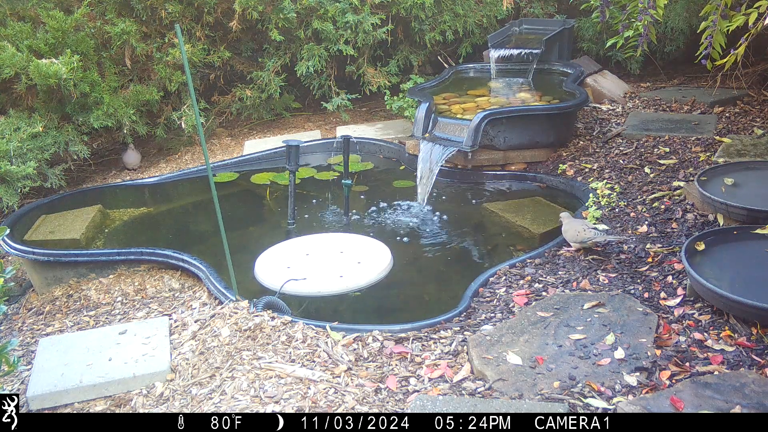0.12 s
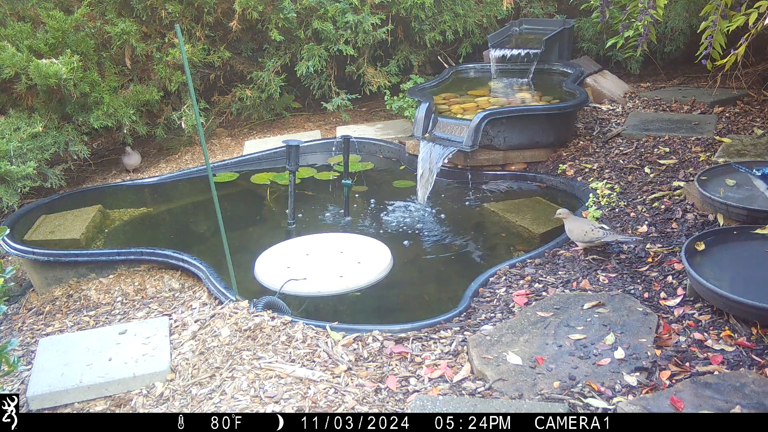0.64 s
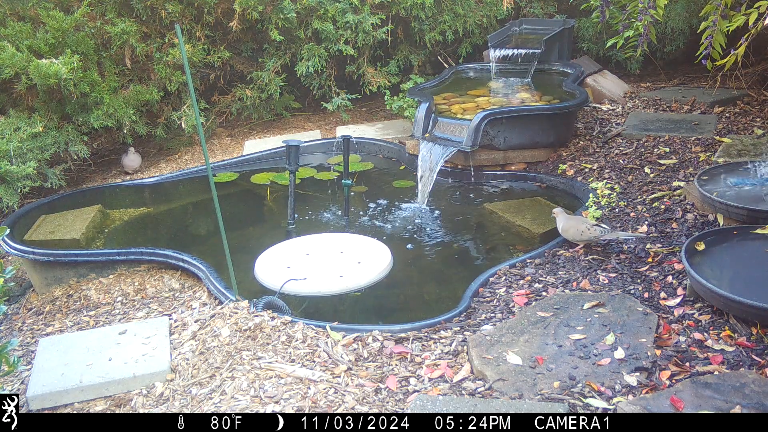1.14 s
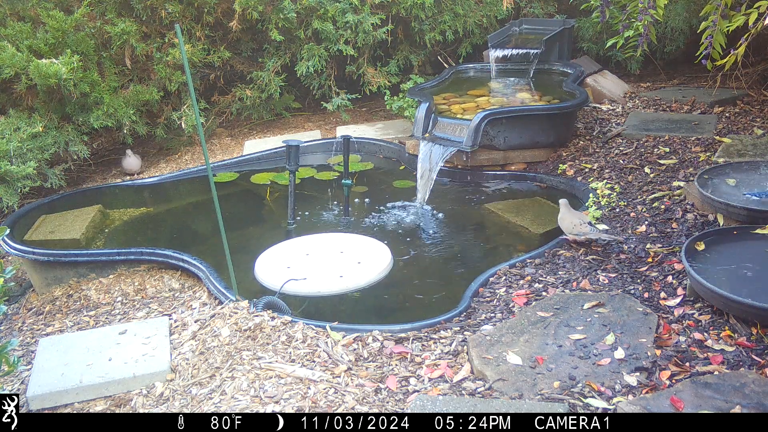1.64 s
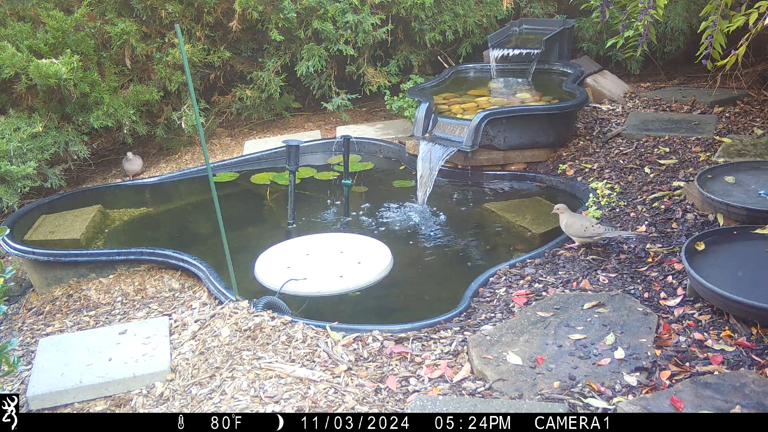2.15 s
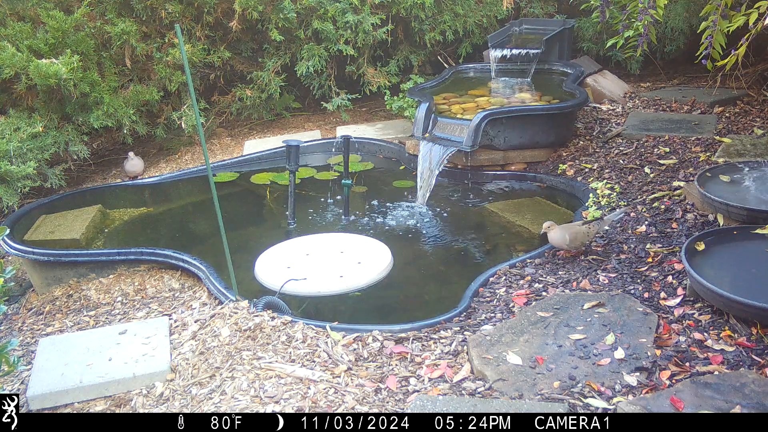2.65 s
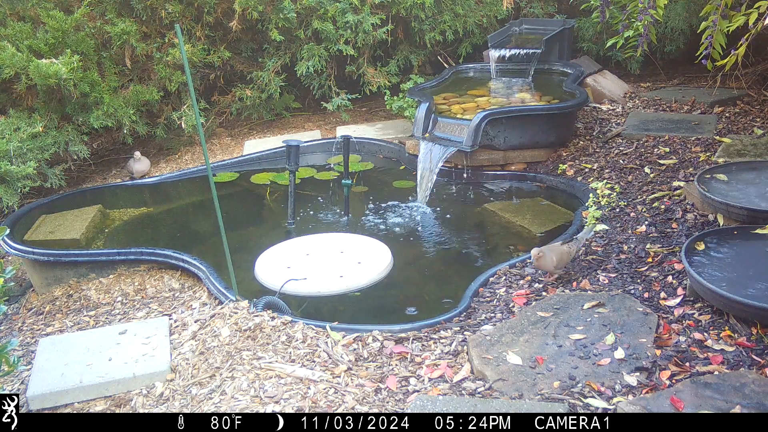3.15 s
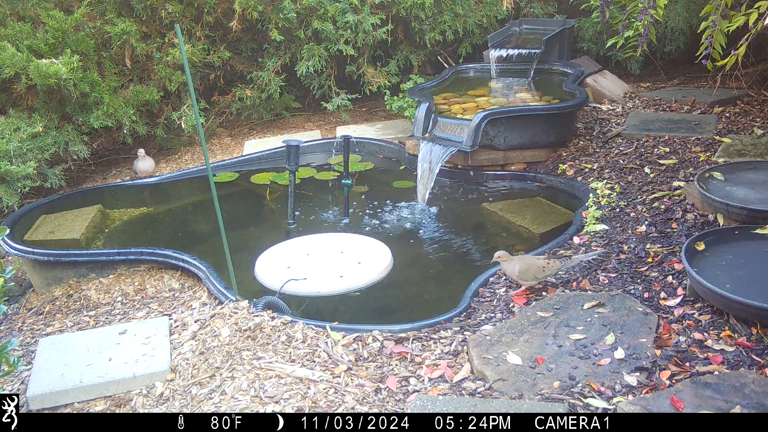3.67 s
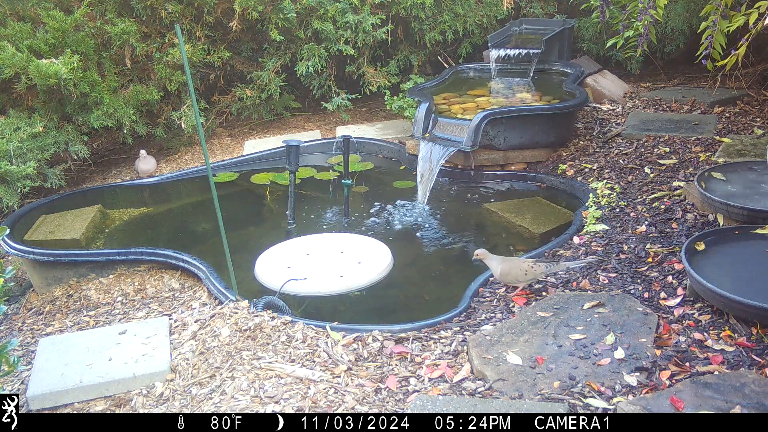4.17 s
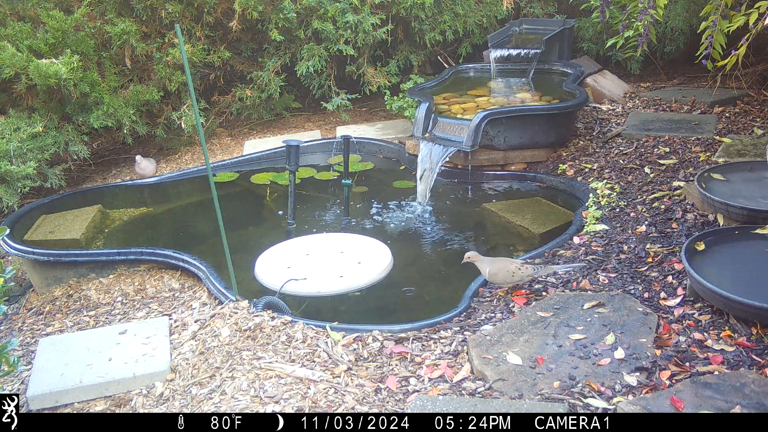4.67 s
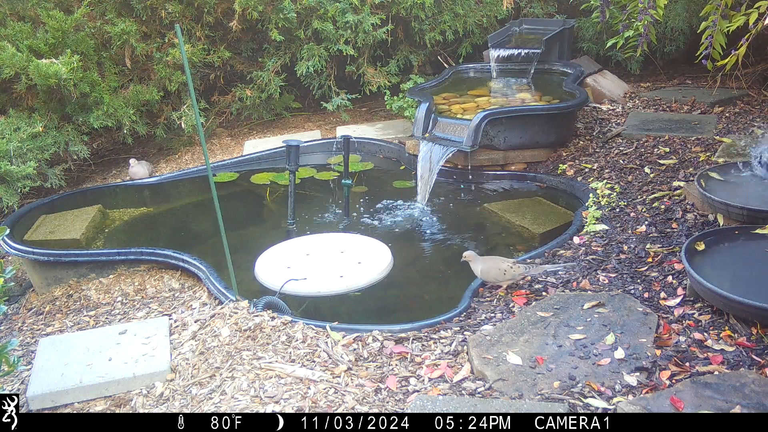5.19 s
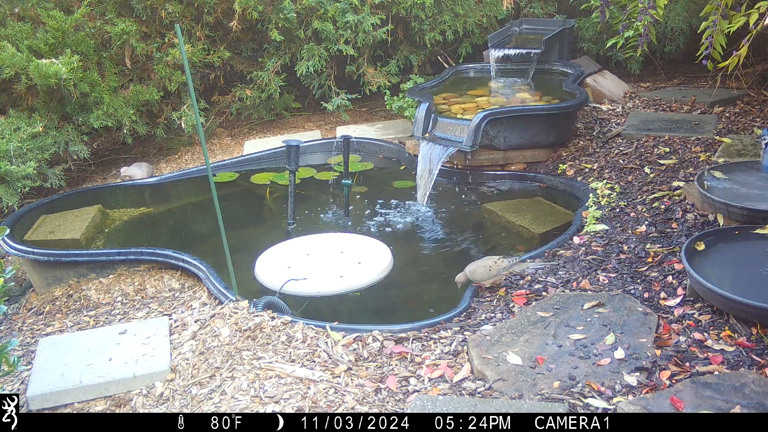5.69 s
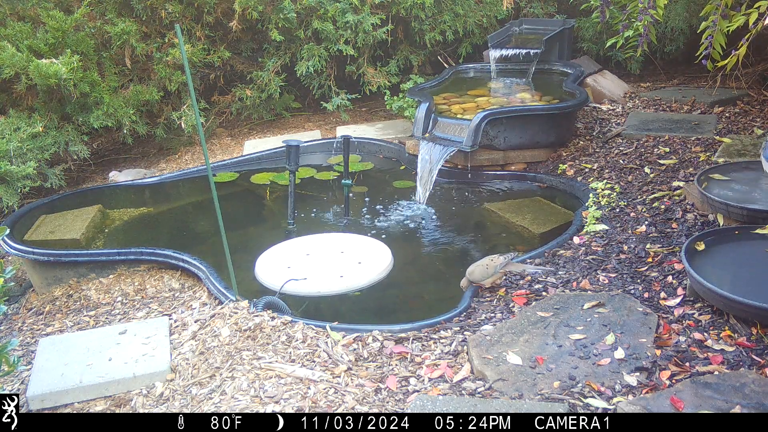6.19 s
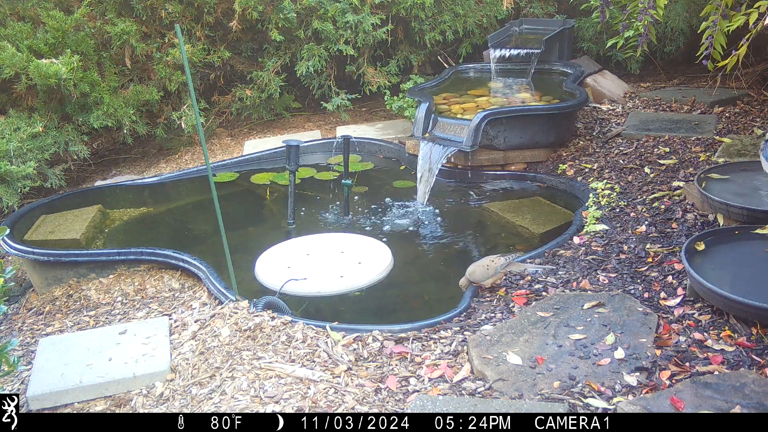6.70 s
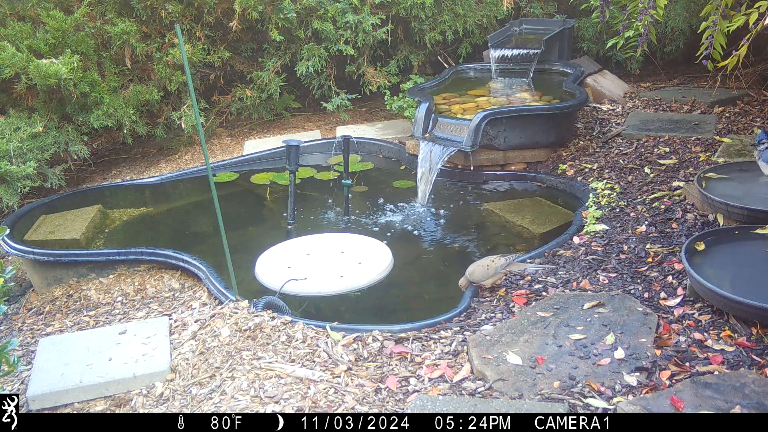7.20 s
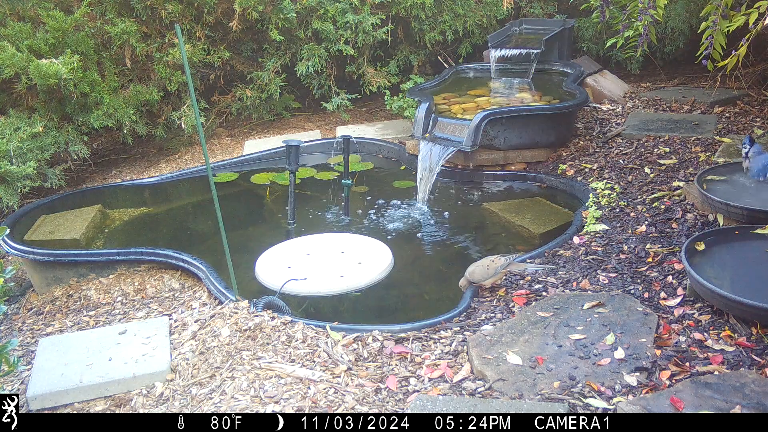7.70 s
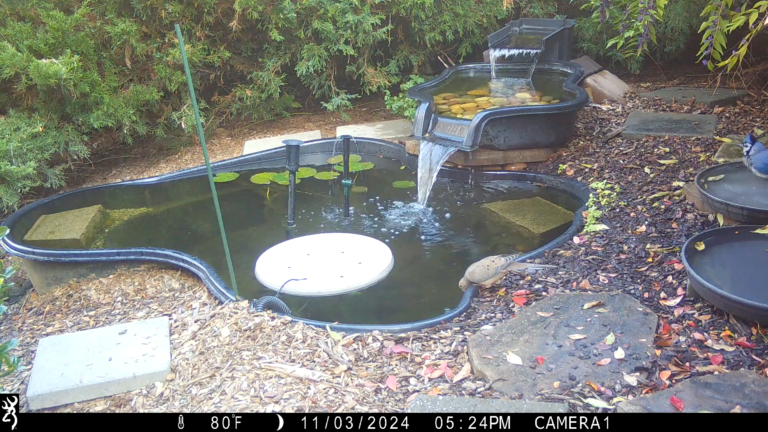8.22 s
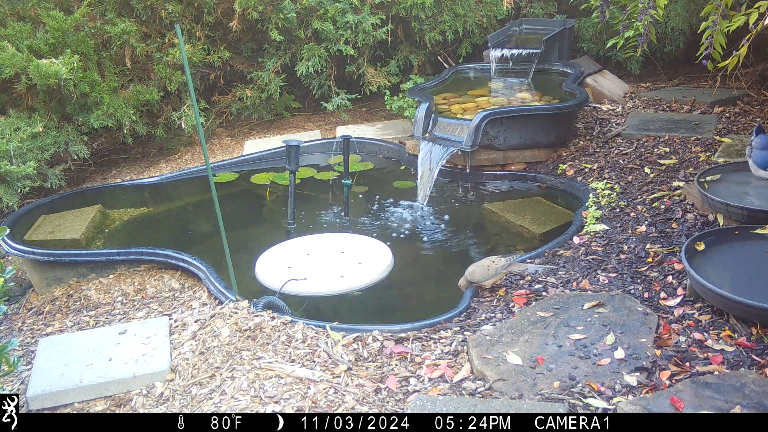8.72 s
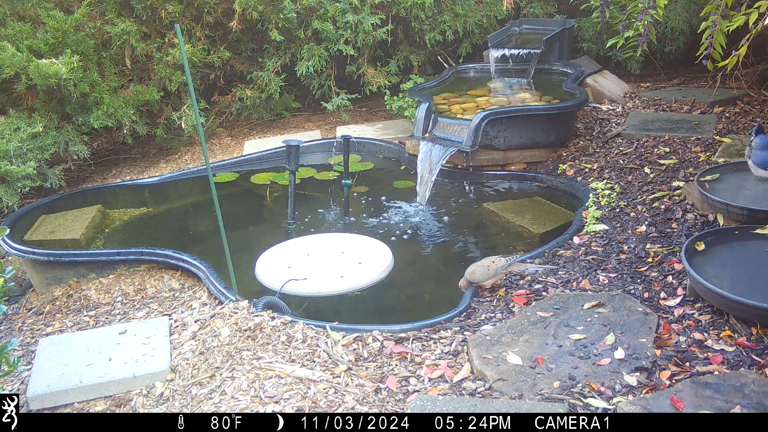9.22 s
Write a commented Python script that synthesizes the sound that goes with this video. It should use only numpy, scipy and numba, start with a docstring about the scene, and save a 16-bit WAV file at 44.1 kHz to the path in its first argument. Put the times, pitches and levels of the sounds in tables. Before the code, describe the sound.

Constant splashing trickle of a small pond waterfall, fizzing bubbles and droplet ticks, briefly interrupted by a double plastic tap.

```python
"""A sheet of water falls from a spillway into a garden pond, heard outdoors by a small narrow-band microphone.
The churned water hisses as bands of noise; trapped air bubbles ring as decaying sines that glide in pitch.
Droplets tick as bare clicks, and slaps of spray are bursts of noise.
A bird's feet knock twice on a plastic basin, whose modes ring as damped resonators.
Wavering sines give a faint pump hum and electronic whine, with a faint hiss."""
import sys
import numpy as np
from scipy import signal
from scipy.io import wavfile
from numba import njit

SR = 44100
rng = np.random.default_rng(int(sys.argv[2]) if len(sys.argv) > 2 else 0)


def to_wav(sig):
    """Store sig (one row per channel, or 1-D mono) as 16-bit WAV at the path in sys.argv[1].

    Samples outside -1..1 are clipped; the rate is SR.
    """
    pcm = np.clip(np.atleast_2d(sig), -1, 1) * 32767
    pcm = np.round(pcm).astype(np.int16)
    wavfile.write(sys.argv[1], SR, pcm.T)  # frames by channels


def linear_from_db(decibels):
    """Turn decibels (scalar or array-like) into linear amplitude factors; 0 gives 1."""
    return 10 ** (np.asarray(decibels, float) / 20)


N = 412335

# Sharpest slaps of spray, strength in the treble: start_s, level_db
SHARP_SLAPS = [(0.354, -58.5), (0.607, -61), (1.373, -61), (1.4597, -54), (1.787, -57), (1.8366, -58),
               (2.378, -54), (2.654, -64.5), (3.019, -56.5), (3.6575, -70), (3.894, -55), (4.0328, -61.5),
               (4.348, -58.5), (4.6997, -69), (6.016, -57), (6.366, -58), (7.124, -59.5), (7.191, -58.5)]
# Level of the water's sound, which swells at times: time_s, level_db
FALL_LEVEL = [(0, -45), (.5, -45.5), (.9, -46), (1.2, -43.5), (1.45, -43.5), (1.7, -45), (2.2, -45.5),
              (2.75, -44.5), (3.2, -46), (4.9, -46), (5.12, -41.5), (5.25, -44), (5.45, -46.5), (7, -47),
              (7.5, -44.5), (8.1, -46), (9.35, -46)]
# Feet on the basin, levels before the filters: start_s, peak_db, crack_hz, snap_db
FOOT_KNOCKS = [(5.0983, -5.5, 3260, -33), (5.1455, -6, 2410, -51)]
# Modes of the plastic basin, levels relative to one another: pitch_hz, level_db, t60_s
BASIN_MODES = [(1220, 0, 0.022), (1660, 8, 0.008), (2100, -13, 0.024), (2440, 5, 0.0089), (2880, -6, 0.023),
               (3300, -15, 0.026), (3700, 1.5, 0.01)]
# Relative spectral density of the water: pitch_hz, level_db (per Hz)
WATER_SPECTRUM = [(18, -52), (30, -20.5), (378, -9), (706, -4.5), (1030, -4), (1400, -7.5), (1550, -6),
                  (1950, -4.5), (2170, -10.5), (2670, -1), (3720, -6), (4300, 0), (5590, -24.5),
                  (9460, -120)]
# Faint steady tones of the electronics: pitch_hz, level_db (rms)
WHINE_TONES = [(7768, -100), (7795, -104), (7827, -100), (15590, -114)]
# Hum of the pump: pitch_hz, level_db (rms)
PUMP_TONES = [(59, -85), (124, -83.5)]
# Loudest drops, each plucking the bubble it traps; levels before the filters: start_s, peak_db, pitch_hz, t60_ms
LOUD_DROPS = [(0.245, -26.5, 3360, 26), (0.353, -30.5, 1250, 100), (0.6039, -35, 1466, 115),
              (0.606, -37.5, 524, 25), (0.727, -30, 3470, 15), (0.853, -30.5, 1530, 17),
              (0.9423, -33, 1360, 58), (1.017, -35, 1510, 52), (1.1479, -26.5, 2350, 10),
              (1.319, -29.5, 3700, 20), (1.3738, -17.5, 2250, 3.7), (1.4154, -27.5, 3120, 14),
              (1.4414, -32, 3930, 29), (1.458, -33, 3500, 38), (1.549, -36, 2600, 14),
              (1.5583, -28.5, 2430, 26), (1.679, -31.5, 3600, 12), (1.7076, -24, 3180, 3.2),
              (1.7808, -30, 3230, 34), (1.838, -39.5, 660, 61), (2.2516, -33.5, 735, 64),
              (2.4632, -33, 1730, 36), (2.492, -28, 3120, 13), (2.559, -33, 1660, 47),
              (2.687, -27, 1650, 6.6), (2.74, -32.5, 2460, 23), (2.772, -30, 3550, 19),
              (2.868, -32.5, 2540, 17), (2.9803, -39.5, 682, 52), (3.046, -32, 1850, 49),
              (3.1006, -20, 2930, 2.5), (3.5355, -26, 3380, 12), (3.63, -27.5, 2450, 15),
              (3.864, -30.5, 3020, 29), (3.981, -35.5, 2050, 17), (4.3478, -31, 2600, 8.2),
              (4.759, -34.5, 1410, 56), (4.7894, -27, 3240, 10), (4.8544, -29.5, 3600, 21),
              (4.8616, -29.5, 1660, 39), (5.062, -30, 3300, 9), (5.151, -27, 1820, 14),
              (5.165, -30, 3370, 12), (5.285, -30.5, 2340, 8), (5.4474, -28.5, 2800, 11),
              (5.4555, -22, 3000, 2.3), (5.7901, -24, 2320, 3), (5.8602, -34.5, 1620, 35),
              (5.9836, -32.5, 3590, 43), (6.125, -47, 658, 94), (6.17, -25, 2970, 10),
              (6.2348, -36.5, 875, 130), (6.667, -17, 4070, 4.3), (6.893, -46, 646, 160),
              (7.1266, -30.5, 2540, 13), (7.1842, -32, 2680, 29), (7.476, -20, 1920, 3.4),
              (7.5312, -24, 3350, 5.4), (7.833, -34, 1500, 22), (7.9653, -38, 710, 25),
              (8.27, -35.5, 1870, 22), (8.374, -40.5, 1164, 54), (8.502, -31, 2580, 25),
              (8.5442, -24.5, 2720, 21), (8.583, -32.5, 1950, 30), (9.2053, -31, 1740, 27),
              (9.289, -32.5, 2350, 32), (9.303, -34.5, 1365, 72)]
# Loudest gulps of air dragged under, levels before the filters; rise is a share of the pitch, reached at t60:
# start_s, peak_db, pitch_hz, rise
LOUD_GULPS = [(0.775, -32, 1340, 2), (0.8003, -35, 1050, 1.4), (1.441, -29, 2880, .24),
              (1.8605, -41, 720, -0.48), (1.8726, -31, 2770, 0.073), (2.29, -32.5, 3470, 0.071),
              (2.371, -35.5, 1300, 0.4), (2.6995, -42, 653, 0.45), (3.2183, -31.5, 1520, 0.32),
              (3.318, -43.5, 650, .7), (3.3456, -33, 1050, 2.3), (3.441, -37.5, 1345, 0.24),
              (3.738, -36, 1240, 0.94), (3.846, -35.5, 1400, 0.96), (4.688, -38, 1290, 0.83),
              (4.758, -25, 2640, 0.009), (4.8936, -26.5, 1590, -0.1), (4.9107, -37, 970, 1.5),
              (5.2117, -29.5, 3560, 0.15), (5.459, -34, 1270, 1), (6.282, -36, 1340, 0.87),
              (6.441, -41.5, 730, 1.15), (6.685, -33.5, 1020, 0.95), (6.7228, -35.5, 850, 0.33),
              (6.7355, -33, 1160, .9), (7.087, -33, 1930, -0.12), (7.2, -40.5, 880, 1.),
              (7.966, -29.5, 1400, 0.018), (8.0045, -26, 3270, 0.19), (8.423, -36, 1320, 0.57),
              (8.5713, -29, 1120, 1.6), (8.758, -32.5, 1380, .55), (9.0105, -24.5, 2790, -0.13)]

PLUCKED_LIFE_S, OTHER_LIFE_S = 0.045, 0.07   # longest life of a loud drop's bubble, and of any other
TREBLE_LOW_HZ, TREBLE_HIGH_HZ = 7500 / 1.46, 7500 * 1.03   # faint treble above the microphone's band


def rms_one(x):
    """Normalisation: divide by the root mean square."""
    return x / np.sqrt(np.mean(x ** 2) + 1e-20)


def water_db(hz):
    """Spectral colour: level of the water at a pitch, read along log frequency."""
    table_hz, level_db = np.transpose(WATER_SPECTRUM)
    return np.interp(np.log(hz), np.log(table_hz), level_db)


def drift(rate_hz):
    """Low-pass random modulation: noise through two equal poles, rms 1."""
    step = 40   # samples between slow values
    pole = np.exp(-2 * np.pi * rate_hz * step / SR)
    noise = rng.standard_normal(N // step + 2002)
    slow = signal.lfilter([1], [1, -2 * pole, pole * pole], noise)[2000:]
    return np.interp(np.arange(N) / step, np.arange(len(slow)), rms_one(slow))


def band(x, low_hz, high_hz, order=2):
    """Band-pass filtering: keep the energy between two corners."""
    return signal.sosfilt(signal.butter(order, [low_hz, high_hz], "band", fs=SR, output="sos"), x)


def decay(impulses, t60):
    """Exponential decay: each impulse falls by 60 dB in t60 seconds."""
    return signal.lfilter([1], [1, -linear_from_db(-60 / (t60 * SR))], impulses)


def ring(clicks, hz, t60):
    """Damped resonance: a unit click starts a decaying sine of initial height 1."""
    radius, angle = linear_from_db(-60 / (t60 * SR)), 2 * np.pi * hz / SR
    feedback = [1, -2 * radius * np.cos(angle), radius * radius]
    return signal.lfilter([0, np.sin(angle)], feedback, clicks)


def microphone(x):
    """Band limitation: the response falls steeply above 3846 Hz."""
    return signal.sosfilt(signal.cheby1(5, 0.6, 3846, fs=SR, output="sos"), x)


def tones(lines, waver_db):
    """Amplitude modulation: sines of steady pitch whose levels waver slowly."""
    t = np.arange(N) / SR
    total = 0
    for hz, db in lines:
        level = np.sqrt(2) * linear_from_db(db + waver_db * drift(2.7))
        total = total + level * np.sin(2 * np.pi * hz * t)
    return total


def electronics():
    """Electronic self-noise: white hiss and faint steady whines."""
    hiss = linear_from_db(-86) * rng.standard_normal(N)
    return hiss + tones(WHINE_TONES, waver_db=0.3)


def pump_hum():
    """Low hum of the pump: wavering sines."""
    return tones(PUMP_TONES, waver_db=1.0)


def basin(crack_t60, ring_db, scuff_db, scuff_t60):
    """Modal excitation: each foot gives a crack, rings the modes afresh and scuffs; returns knocks and snaps."""
    out, clicks, snaps = np.zeros(N), np.full(N, 1e-18), np.full(N, 1e-18)
    for s, peak_db, crack_hz, snap_db in FOOT_KNOCKS:
        blow = np.full(N, 1e-18)
        blow[round(s * SR)] = linear_from_db(peak_db)
        out += ring(blow, crack_hz, crack_t60)
        clicks += blow
        snaps[round(s * SR) + 25] = linear_from_db(snap_db)   # the claw slips just after contact
    scuff = rms_one(band(rng.standard_normal(N), 1100, 5100, order=1))
    out += linear_from_db(scuff_db) * decay(clicks, scuff_t60) * scuff
    for k, (hz, level_db, t60) in enumerate(BASIN_MODES):
        strength = linear_from_db(level_db + ring_db + rng.normal(0, 2.2, N))   # differs from knock to knock
        out += ring(clicks * strength * (-1) ** k, hz, t60)
    return band(out, 1550, 15000), band(snaps, 5500, 15000)


def droplets(per_s, spread_db, clump_db):
    """Random impulses: spray ticks on the surface as bare clicks in flurries; rms 1."""
    hit = rng.random(N) < per_s * linear_from_db(clump_db * drift(14)) / SR
    sizes = linear_from_db(spread_db * np.minimum(rng.exponential(1, N), 4))
    signs = rng.choice([-1, 1], N)
    return rms_one(hit * sizes * signs + 1e-18)


def splashing(slaps, t60):
    """Noise bursts: loudness jumps within a millisecond or so at each slap and dies away."""
    envelope = signal.lfilter([0.04], [1, -0.96], decay(slaps, t60))
    return envelope * rng.standard_normal(N)


def small_slaps(per_s, spread_db):
    """Random noise bursts: spray slaps the surface at chance moments; rms 1."""
    hit = rng.random(N) < per_s / SR
    slaps = hit * linear_from_db(spread_db * np.minimum(rng.exponential(1, N), 2.5))
    return rms_one(splashing(slaps, t60=0.034))


def sharp_slaps():
    """Timed noise bursts: the slaps that stand out."""
    slaps = np.zeros(N)
    s, level_db = np.transpose(SHARP_SLAPS)
    slaps[(s * SR).astype(int)] = linear_from_db(level_db)
    return splashing(slaps, t60=0.041)


@njit
def add(out, rows, phases, sr, bend, life):
    """Bubble resonance: a sine swells, decays and glides (as time to the power bend) until it bursts."""
    for k in range(len(rows)):
        s, peak, hz, swell, t60, rise = rows[k]
        fade, start = t60 / np.log(1000), int(s * sr)
        crest = swell * np.log(1 + fade / swell)   # moment of the greatest height
        peak /= (1 - np.exp(-crest / swell)) * np.exp(-crest / fade)
        for i in range(min(int(min(t60, life) * sr), len(out) - start)):
            t = i / sr
            cycles = hz * t * (1 + rise * (t / t60) ** bend / (bend + 1))
            envelope = (1 - np.exp(-t / swell)) * np.exp(-t / fade)
            out[start + i] += peak * envelope * np.sin(2 * np.pi * cycles + phases[k])


def gulps(out):
    """Rising bubble resonance: air dragged under pinches off softly, most gliding upward as it surfaces."""
    s, peak_db, hz, rise = np.transpose(LOUD_GULPS)
    swell_s = 0.008 + 0 * s
    t60 = 23.5 / hz   # it rings for a set number of cycles
    phases = rng.uniform(0, 2 * np.pi, len(s))
    add(out, np.c_[s, linear_from_db(peak_db), hz, swell_s, t60, rise], phases, SR, 1., OTHER_LIFE_S)


def drops(out):
    """Impact and plucked resonance: a drop clicks and its bubble curls upward; returns the bare clicks."""
    s, peak_db, hz, t60_ms = np.transpose(LOUD_DROPS)
    t60 = np.maximum(t60_ms, 2) / 1000
    swell_s = 0.00012 + 0 * s
    rise = 130000 * t60 ** 2 / hz   # pitch gains 130000 Hz/s^2 times time squared
    phases = rng.uniform(0, 2 * np.pi, len(s))
    add(out, np.c_[s, linear_from_db(peak_db), hz, swell_s, t60, rise], phases, SR, 2., PLUCKED_LIFE_S)
    # a big drop traps a lower bubble and clicks harder: 5.5 dB per octave below 2 kHz
    impact_db = peak_db + 10 + 5.5 * np.log2(2000 / hz)
    impacts = np.full(N, 1e-18)
    impacts[(s * SR).astype(int)] = linear_from_db(impact_db)
    return impacts


def clear_bubbles():
    """Superposition: the gulps and drops that stand out; also the bare clicks of the drops."""
    out = np.zeros(N)
    gulps(out)
    impacts = drops(out)
    return out + band(impacts, 800, 6000, order=1), impacts


def swarm(count, low_hz, high_hz, cycles, spread_db, rise, clump_db):
    """Statistical superposition: many small bubble resonances born in clumps; rms 1."""
    chance = np.cumsum(linear_from_db(clump_db * drift(22)))
    when, pitch, size, length, glide, soft, phase = rng.random((count, 7)).T
    s = np.interp(when * chance[-1], chance, np.arange(N) / SR)
    hz = low_hz * (high_hz / low_hz) ** pitch
    size_db = spread_db * np.minimum(-np.log(size), 3)   # few large, many small
    peak = linear_from_db(water_db(hz) + size_db) * np.sqrt(hz)
    t60 = cycles / hz * 6.5 ** (length - 0.5)
    swell = np.where(soft < 0.15, 0.047 * t60, 0.0002)   # some grow softly, most are plucked
    rises = rise * (glide ** 3 - 0.08)   # few glide far upward, some sink a little
    out = np.zeros(N)
    add(out, np.c_[s, peak, hz, swell, t60, rises], 2 * np.pi * phase, SR, 1., OTHER_LIFE_S)
    return rms_one(out)


def churn(patchy_db):
    """Turbulent noise: third-octave bands, the upper ones flickering at random, partly together; rms 1."""
    out, together = 0, drift(20)
    edges = 22 * 2 ** np.arange(0, 8.4, 1 / 3)
    white = rng.standard_normal((2, N))   # neighbouring bands take turns
    for k, (low, high) in enumerate(zip(edges, edges[1:])):
        hz = np.sqrt(low * high)
        flicker_share = np.clip(np.log2(hz / 350), 0, 1)   # the low rumble is steady
        flicker_db = patchy_db * flicker_share * (0.89 * together + drift(41))
        out = out + linear_from_db(water_db(min(hz, 3700)) + flicker_db) * band(white[k % 2], low, high)
    return rms_one(out)


def falling_water(spray):
    """Superposition: churned water, fizzing and gurgling bubbles, and spray make the fall."""
    fizz = swarm(count=5200, low_hz=1191, high_hz=5313, cycles=33.3, spread_db=4.5, rise=1.0, clump_db=4.5)
    gurgle = swarm(count=600, low_hz=533.3, high_hz=1683, cycles=40, spread_db=2.5, rise=2.2, clump_db=3.0)
    fall = linear_from_db(-3.0) * churn(patchy_db=2.5)
    fall = fall + linear_from_db(-1.0) * fizz + linear_from_db(-14.5) * gurgle
    return fall + linear_from_db(-5.5) * rms_one(band(spray, 1300, 6000))


def scene():
    """Linear mixing: the sources pass the microphone's band, with faint treble above it."""
    churn_db = np.interp(np.arange(N) / SR, *np.transpose(FALL_LEVEL))
    flow = linear_from_db(churn_db)
    spray = linear_from_db(-6.5) * droplets(per_s=380, spread_db=9.5, clump_db=4.0)
    spray = spray + small_slaps(per_s=90, spread_db=6.0)
    slaps = sharp_slaps()
    knocks, snaps = basin(crack_t60=0.0042, ring_db=-17, scuff_db=-21, scuff_t60=0.06)
    bubbles, impacts = clear_bubbles()

    # the faint treble hiss above the microphone's band gains 2 dB per dB of the fall's level
    treble_level = linear_from_db(-81 + 2 * (churn_db - churn_db.mean()))
    rough_noise = spray + linear_from_db(-6) * rng.standard_normal(N)
    treble_hiss = treble_level * rms_one(band(rough_noise, TREBLE_LOW_HZ, TREBLE_HIGH_HZ))
    treble_bursts = band(slaps + linear_from_db(-32.5) * impacts, TREBLE_LOW_HZ, TREBLE_HIGH_HZ)
    treble = treble_hiss + treble_bursts + snaps

    heard = flow * falling_water(spray) + band(bubbles, 310, 15000) + knocks
    heard = heard + linear_from_db(31.5) * band(slaps, 980, 12000)   # a slap is far louder inside the band
    return (microphone(heard) + treble + pump_hum())[None]


def band_limit(x):
    """A steep low-pass at the top of the band."""
    return signal.sosfilt(signal.butter(12, 15740, fs=SR, output="sos"), x)


def record(dry):
    """Additive noise: the electronics add a faint hiss and whine."""
    mix = dry + electronics()
    return band_limit(mix)


dry = scene()
out = record(dry)
to_wav(out)
```